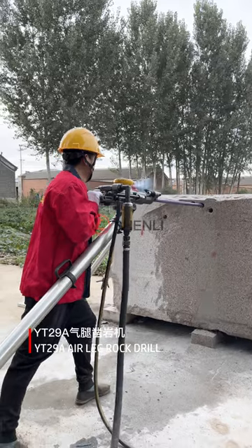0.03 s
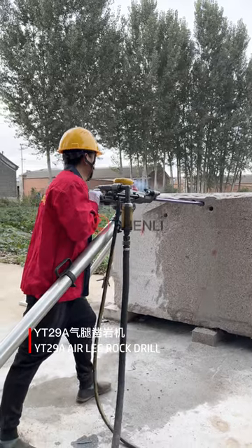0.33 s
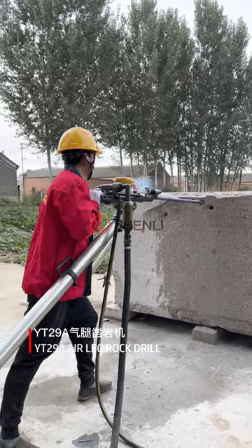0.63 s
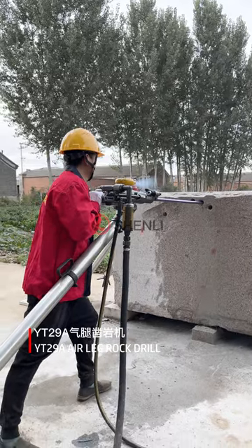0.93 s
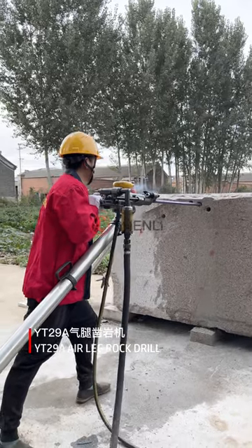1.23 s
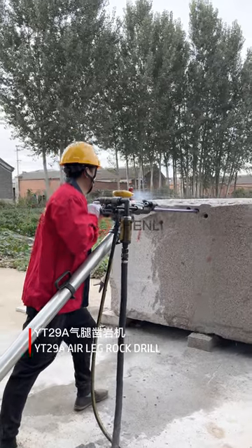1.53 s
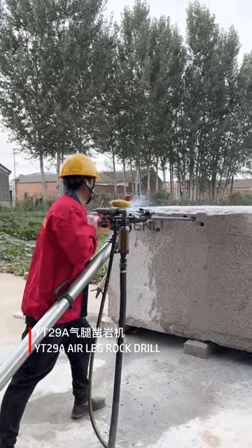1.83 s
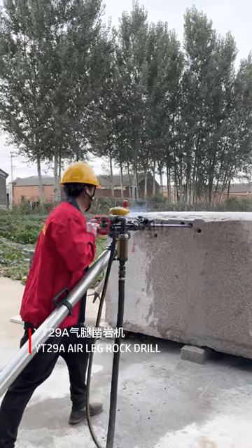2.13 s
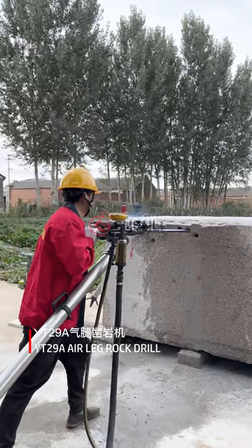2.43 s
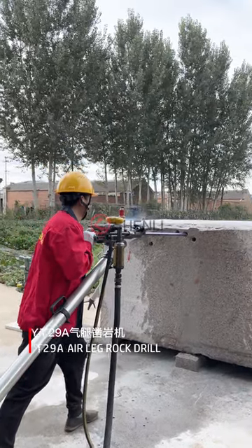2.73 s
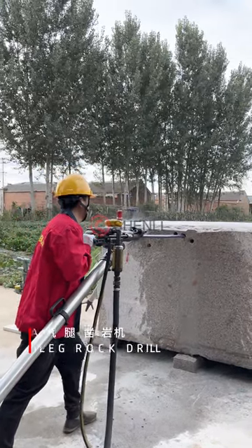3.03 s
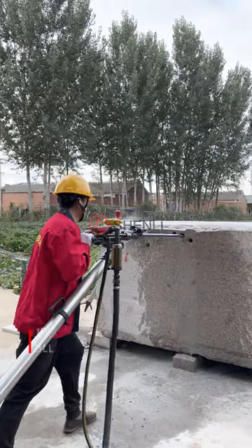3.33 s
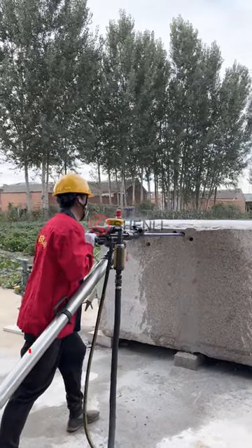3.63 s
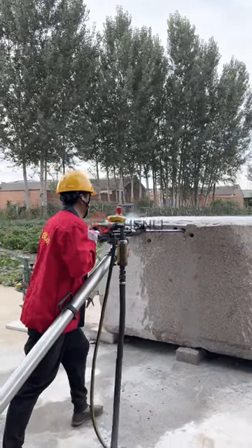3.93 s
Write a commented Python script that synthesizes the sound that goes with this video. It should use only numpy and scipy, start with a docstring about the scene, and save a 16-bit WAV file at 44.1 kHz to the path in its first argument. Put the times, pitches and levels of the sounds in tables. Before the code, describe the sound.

A pneumatic rock drill hammers into stone outdoors for the whole four seconds, about 36 beats a second, with a low buzzing exhaust and constant air hiss. The steel rod rattles in small swells, crunches stone and gives a high, wavering ring toward the right. The level holds fairly steady until about 1.5 seconds, then gradually falls while the drilling keeps its pace.

```python
"""In an open yard, an air-powered rock drill bores into a stone block, slowly growing quieter.
Its piston goes back and forth about 36 times a second. Each cycle lets out two puffs of air,
strikes the drill steel (the rod that cuts the stone) and knocks more lightly on the way back.
The steel rattles in the chuck that holds it, crushes stone and rings near 4.8 kHz.
Compressed air hisses throughout."""
import sys
import numpy as np
from scipy import signal
from scipy.fft import rfft, irfft, next_fast_len
from scipy.io import wavfile
from scipy.ndimage import map_coordinates

SR = 44100
rng = np.random.default_rng(int(sys.argv[2]) if len(sys.argv) > 2 else 0)


def generate_wav(sig):
    """Save sig (samples, or channels by samples) to the path in sys.argv[1] as 16-bit PCM at SR."""
    pcm = np.round(np.clip(np.atleast_2d(sig).T, -1, 1) * 32767).astype(np.int16)
    wavfile.write(sys.argv[1], SR, pcm)


N = 176400

# How fast the piston runs. Each row: time in seconds, cycles per second.
PISTON_SPEED = [(0.0, 34.524), (0.062, 36.048), (0.417, 35.315), (0.417, 35.032), (0.449, 35.703),
                (0.524, 34.581), (0.53, 35.893), (0.881, 35.342), (0.961, 36.227), (1.158, 34.946),
                (1.216, 35.918), (1.411, 35.309), (1.458, 35.813), (1.783, 35.27), (1.817, 35.764),
                (1.892, 35.163), (1.945, 36.862), (2.041, 35.139), (2.091, 36.58), (2.193, 35.478),
                (2.296, 36.522), (2.445, 35.409), (2.646, 36.919), (2.698, 35.883), (2.781, 37.593),
                (2.856, 34.933), (3.156, 36.057), (3.257, 35.158), (3.364, 36.429), (3.52, 35.167),
                (3.744, 36.082), (3.788, 34.729), (3.851, 36.202), (4.0, 35.145)]
# The fade of everything but the steel's main ring. Each row: time in seconds, gain in dB.
DRILL_FADE = [(0.0, -24.5), (1.6, -26.5), (3.8, -35), (4.0, -36.5)]
# What happens in one cycle. Each row: place in the cycle from 0 to 1, relative level in dB.
PUFF_PLACES = [(0.358, -5), (0.829, -5)]
KNOCK_PLACES = [(0.185, -1), (.465, 1.5)]  # the return knock, then the working blow
# The exhaust's hum. Each row: multiple of the piston speed, relative level in dB.
HUM_TONES = [(2, -9), (4, -12), (7, -21.5), (10, -26), (14, -27)]
# The tone colour of each sound. Each row: frequency in Hz, relative level in dB.
PUFF_COLOUR = [(20, -54.5), (36, -35.5), (55, 5.5), (72, 12.5), (110, -0.5), (145, 9.5), (175, 13),
               (215, -10.5), (260, 0.5), (360, 0.5), (500, 1.5), (800, -15), (2000, -29.5)]
ROAR_COLOUR = [(20, -43), (60, -20), (150, 7.5), (280, -9), (480, -1), (750, -4.5), (1500, -10),
               (5000, -57)]
CRACK_COLOUR = [(100, -9), (450, 8.5), (1200, 5), (2500, 0), (8000, -4), (15000, -6)]
THUD_COLOUR = [(60, -38), (200, -16), (400, 5), (650, 5.5), (850, 1.5), (1200, -21), (2000, -8),
               (5000, -59)]
RATTLE_COLOUR = [(200, -10.5), (600, -6), (950, 4.5), (1300, 1.5), (1600, 0.5), (1850, -14), (3000, 0),
                 (8000, -48.5)]
GRIT_COLOUR = [(150, 9.5), (400, 11.5), (900, 10), (1800, -7), (3000, 18), (4000, 8.5), (5100, 1),
               (7000, 10), (14000, -39)]
HISS_COLOUR = [(30, -84.5), (200, 19), (1000, -1), (2500, 8), (4000, 8), (5500, 10.5), (7000, 2.5),
               (9500, 4.5), (12500, 3), (14000, 3), (16000, -20)]
GRIND_COLOUR = [(300, -23), (1000, -9), (1700, -4.5), (2600, -3), (3500, 10), (5000, -5), (9000, -44)]
ECHO_COLOUR = [(140, -12.0), (500, 3.5), (2500, 12.0), (8000, -43)]
# The housing's tones. Each row: frequency in Hz, relative level in dB, seconds to fade by 60 dB.
HOUSING_TONES = [(360, 4.5, 0.042), (498.6, -4.5, 0.043), (623, -7, 0.009), (1055, -6, 0.072)]
# Bursts of rattling in the chuck. Each row: time of the peak in seconds, relative level in dB.
RATTLE_BURSTS = [(0.01, 2.5), (.145, -4), (.34, -3), (.735, 1), (0.908, 0.5), (1.03, -7), (1.11, -5),
                 (1.298, 0.5), (1.499, -1), (1.69, -5), (1.869, -2), (2.18, -3), (2.37, -7), (2.52, -6),
                 (2.885, -2), (3.02, -9), (3.21, -2), (3.497, 2), (3.71, -8), (3.85, -4)]
# The steel's weaker tones. Each row: frequency in Hz, relative level in dB, rate of wavering in Hz.
STEEL_TONES = [(1569, 2, 51), (2105, 5, 70), (2521, 3.5, 60), (2740, 2.5, 79), (2995, 6.5, 99),
               (3194, 6.5, 40), (6470, 6, 24), (8160, 3.5, 24)]
# One tone flares up as the bit seats differently in the stone.
# Each row: time of the peak in seconds, frequency in Hz, relative level in dB.
STEEL_FLARES = [(0.063, 2526, -7), (0.465, 2526, -9), (0.91, 2526, -9), (0.69, 2900, -8), (3.37, 3208, -6),
                (1.58, 6465, -11), (3.33, 6465, -15), (1.47, 8121, -20), (3.0, 8121, -5)]
# The strength of the steel's main ring. Each row: time in seconds, relative level in dB.
RING_LEVEL = [(0.0, -45), (0.05, -34), (0.2, -36), (0.7, -32), (0.76, -44), (0.77, -35), (1.18, -38),
              (1.22, -42), (1.35, -33), (1.39, -41), (1.49, -31), (1.6, -38), (1.64, -33), (2.16, -38),
              (2.33, -33), (2.38, -43), (2.43, -37), (2.83, -39), (2.87, -47), (2.91, -37), (3.01, -47),
              (3.1, -33), (3.14, -47), (3.35, -39), (3.4, -45), (3.8, -42), (3.82, -50), (4.0, -44)]
# Where that ring sits. Each row: time in seconds, left minus right level in dB.
RING_BALANCE = [(0.0, -2.0), (0.05, -18), (1.77, -22), (1.79, -11), (2.73, -4.5), (3.38, -15), (4.0, -6)]
# Where the machine and its hiss sit. Each row: frequency in Hz, left minus right level in dB.
BODY_BALANCE = [(100, -1.5), (200, -3), (330, -2), (520, -8), (800, 1.5), (1100, 6), (1700, -4.5),
                (2200, -5), (2700, 1), (4300, -7), (5100, 9), (6200, 2)]
HISS_BALANCE = [(4500, 0.98), (6500, 0.27)]
# How much later the right microphone hears. Each row: frequency in Hz, delay in milliseconds.
RIGHT_DELAY = [(100, .02), (1500, .035), (2700, .115), (3300, .11), (5400, .26), (7700, .256), (10000, .25),
               (14000, .244)]
# The length of the yard's echo. Each row: frequency in Hz, seconds to fade by 60 dB.
ECHO_FADE = [(100, 0.32), (1500, 0.071), (12000, 0.037)]

PUFF_DB, ROAR_DB, CRACK_DB, THUD_DB, HOUSING_DB = -6.5, -14, -9, -14.5, -14
RATTLE_DB, GRIT_DB, STEEL_DB, HISS_DB, ECHO_DB = -9.5, -10.5, -12, -6, -18
CRACK_FADE_S, STEEL_RISE_S, STEEL_FADE_S = .011, .002, .06  # a fade is a drop of 60 dB
KNOCK_RISE_DB_PER_S = 1  # crack and thud stand out more as the rest fades
RATTLE_WIDTH_S, FLARE_WIDTH_S = .015, .023
RING_HZ, RING_DB, WAVER_HZ = 4830, 3, 30
RASP_DB, RASP_WIDTH_HZ = -12, 130


def amp(db):
    """Turn decibels into a number to multiply by."""
    return 10 ** (np.asarray(db) / 20)


def unit(x):
    """Scale a signal to an average strength (rms) of 1."""
    return x / np.sqrt(np.mean(x ** 2) + 1e-20)


def along(points, hz):
    """Read between the rows of a frequency table, on a logarithmic scale."""
    freqs, values = np.transpose(points)
    return np.interp(np.log(hz + 1), np.log(freqs + 1), values)


def curve(rows):
    """Join (seconds, value) rows with straight lines, one value per sample."""
    times, values = np.transpose(rows)
    return np.interp(np.arange(N) / SR, times, values)


def wobble(rate):
    """A smooth curve through `rate` random values a second."""
    return map_coordinates(rng.standard_normal(N // 100), [np.arange(N) * rate / SR], mode="wrap")


def filtered(x, response):
    """Multiply each frequency in x by response(hz)."""
    size = next_fast_len(N + SR // 2)
    return irfft(rfft(x, size) * response(np.fft.rfftfreq(size, 1 / SR)), size)[..., :N]


def coloured(x, points, size=8192):
    """Give x a tone colour from a table, at strength 1."""
    cepstrum = irfft(np.log(amp(along(points, np.fft.rfftfreq(size, 1 / SR)))))
    cepstrum[1:size // 2] *= 2  # folded so the filter rings after a hit, never before
    cepstrum[size // 2 + 1:] = 0
    response = irfft(np.exp(rfft(cepstrum)))
    return unit(signal.fftconvolve(x, response)[:N])


def strokes(cycles, rows, scatter_db=1.0, jitter_s=.00006):
    """One click per cycle for each (place, dB) row, a little uneven in size and timing."""
    out, cycle = np.zeros(N), np.arange(int(cycles[-1]) + 1)
    for place, db in rows:
        size, late = rng.standard_normal((2, len(cycle)))
        on_time = np.interp(cycle + place, cycles, np.arange(N))
        at = np.round(on_time + late * jitter_s * SR).astype(int)
        keep = (at >= 0) & (at < N) & (cycle + place < cycles[-1])
        out[at[keep]] += amp(db + scatter_db * size)[keep]
    return out


def surge(cycles, place, fall_db):
    """A gain that jumps at one place in each cycle and falls until the next jump."""
    return amp(-fall_db * ((cycles - place) % 1))


def bump(peak_s, width_s):
    """A bell-shaped rise and fall around one moment."""
    return np.exp(-.5 * ((np.arange(N) / SR - peak_s) / width_s) ** 2)


def grains(per_s, spread_db):
    """Tiny impacts at random times and of random sizes."""
    clicks = (rng.random(N) < per_s / SR) * np.sign(rng.standard_normal(N))
    return clicks * amp(spread_db * np.clip(rng.standard_normal(N), -2, 2))


def placed(x, balance):
    """Make stereo: each frequency gets a left-right balance and reaches the right side later."""
    half = np.array([[.5], [-.5]])

    def response(hz):
        delay_s = along(RIGHT_DELAY, hz) / 1000
        return amp(half * along(balance, hz)) * np.exp(2j * np.pi * hz * delay_s * half)
    return filtered(x, response)


def exhaust(cycles):
    """Two puffs a cycle leave the muffler, making a hum, and swirling air roars after each."""
    puffs = -coloured(strokes(cycles, PUFF_PLACES), PUFF_COLOUR)
    phase = 2 * np.pi * (cycles - PUFF_PLACES[0][0])
    hum = sum(-np.sqrt(2) * amp(db) * np.cos(multiple * phase) for multiple, db in HUM_TONES)
    flow = sum(amp(db) * surge(cycles, place, fall_db=24) for place, db in PUFF_PLACES)
    roar = coloured(flow * rng.standard_normal(N), ROAR_COLOUR)
    return amp(PUFF_DB) * puffs + hum + amp(ROAR_DB) * roar


def piston(cycles):
    """The piston knocks at both ends of its travel: a sharp crack, a thud and a ring of the housing."""
    t = np.arange(N) / SR
    hits = strokes(cycles, KNOCK_PLACES, scatter_db=2.5)
    decay = amp(-60 * t[:SR // 20] / CRACK_FADE_S)
    bursts = signal.fftconvolve(hits, decay)[:N]
    crack = amp(CRACK_DB) * coloured(bursts * rng.standard_normal(N), CRACK_COLOUR)
    thud = amp(THUD_DB) * coloured(hits, THUD_COLOUR)
    rise = amp(KNOCK_RISE_DB_PER_S * (t - t.mean()))
    return rise * (crack + thud) + amp(HOUSING_DB) * housing(hits)


def housing(hits, scatter_db=1.0):
    """Every knock rings the drill's casing with a slightly different mix of its tones."""
    t, out = np.arange(SR // 5) / SR, np.zeros(N + SR)
    tones = np.array([amp(db - 60 * t / fade_s) * np.sin(2 * np.pi * hz * t)
                      for hz, db, fade_s in HOUSING_TONES])
    for at in np.flatnonzero(hits):
        mix = amp(scatter_db * rng.standard_normal(len(tones)))
        out[at:at + len(t)] += hits[at] * mix @ tones
    return unit(out[:N])


def chuck_rattle(cycles):
    """The loose steel rattles after each blow, swelling about five times a second as it turns."""
    swell = amp(-6) + sum(amp(db) * bump(peak_s, RATTLE_WIDTH_S) for peak_s, db in RATTLE_BURSTS)
    shake = amp(3.7 * np.cos(2 * np.pi * (cycles - .58)))
    contacts = grains(per_s=1100, spread_db=4.0) * swell * shake
    return amp(RATTLE_DB) * coloured(contacts, RATTLE_COLOUR)


def drill_bit(cycles):
    """Each blow crushes stone at the tip and rings the steel's weaker tones, which flare now and then."""
    bite = amp(1.5 * np.cos(2 * np.pi * (cycles - .55)) + 3.5 * wobble(40))
    grit = coloured(grains(per_s=5000, spread_db=11) * bite, GRIT_COLOUR)
    blows = strokes(cycles, KNOCK_PLACES[1:])
    flares = np.zeros(N)
    for peak_s, hz, db in STEEL_FLARES:
        tone = singing_steel(blows, [(hz, 0, WAVER_HZ)], flutter_db=1)
        flares += amp(db) * bump(peak_s, FLARE_WIDTH_S) * tone
    tones = singing_steel(blows, STEEL_TONES, flutter_db=3)
    return amp(GRIT_DB) * grit + amp(STEEL_DB) * tones + flares


def singing_steel(blows, rows, flutter_db):
    """The steel's tones swell with every blow and waver in pitch and strength."""
    t = np.arange(SR // 4) / SR
    shape = (1 - np.exp(-t / STEEL_RISE_S)) ** 2 * amp(-60 * t / STEEL_FADE_S)
    swell = unit(signal.fftconvolve(blows, shape)[:N]) + .5  # never silent between blows
    t, tones = np.arange(N) / SR, np.zeros(N)
    for hz, db, waver_hz in rows:
        strength = amp(db + flutter_db * wobble(waver_hz / 3))
        tones += strength * np.sin(2 * np.pi * hz * t + 1.1 * wobble(waver_hz))
    return unit(swell * tones)


def air_hiss(cycles):
    """Compressed air hisses, surging as the valve flips."""
    flow = surge(cycles, place=0.14, fall_db=1.5) * amp(1.1 * wobble(45))
    return amp(HISS_DB) * coloured(flow * rng.standard_normal(N), HISS_COLOUR)


def stone_scatter(cycles, hiss_db=-18, grind_db=-13.5):
    """Hiss and grinding bounce off the stone, so each microphone gets its own noise."""
    bite = amp(2 * np.cos(2 * np.pi * (cycles - .55)) + 2.2 * wobble(29.85))
    hiss = np.array([coloured(noise, HISS_COLOUR) for noise in rng.standard_normal((2, N))])
    grind = np.array([coloured(noise * bite, GRIND_COLOUR) for noise in rng.standard_normal((2, N))])
    return amp(hiss_db) * hiss + amp(grind_db) * grind


def steel_ring(cycles):
    """The steel vibrates along its length: a whine kept up by every blow and roughened by rebounds."""
    blows = strokes(cycles, KNOCK_PLACES[1:], scatter_db=2.5, jitter_s=0.0018)
    rebounds = surge(cycles, place=0.37, fall_db=4.0) * rng.standard_normal(N)
    rasp = unit(filtered(rebounds, lambda hz: 1 / (1 + 2j * (hz - RING_HZ) / RASP_WIDTH_HZ) ** 2))
    whine = singing_steel(blows, [(RING_HZ, 0, WAVER_HZ)], flutter_db=0.88)
    ring = placed(unit(whine + amp(RASP_DB) * rasp), [(RING_HZ, 0)])  # delay only; balance comes next
    sides = amp(curve(RING_BALANCE) * np.array([[.5], [-.5]]))
    return amp(curve(RING_LEVEL) + RING_DB) * sides / sides.mean(axis=0) * ring


def yard_echo(x):
    """The block and the ground throw back a short, thin echo."""
    freqs, t, spectrum = signal.stft(rng.standard_normal((2, SR // 3)), SR, nperseg=256)
    decay = amp(-60 * t / along(ECHO_FADE, freqs)[:, None])
    tail = signal.istft(spectrum * decay, SR, nperseg=256)[1]
    echo = signal.fftconvolve(x, tail / np.linalg.norm(tail[0]), axes=1)[:, :N]
    return filtered(echo, lambda hz: amp(along(ECHO_COLOUR, hz)))


def scene():
    """The piston sets the beat for the whole drill, and the yard adds its echo."""
    cycles = -.11 + np.cumsum(curve(PISTON_SPEED)) / SR  # running count of piston cycles
    body = exhaust(cycles) + piston(cycles) + chuck_rattle(cycles) + drill_bit(cycles)
    hiss = placed(air_hiss(cycles), HISS_BALANCE) + stone_scatter(cycles)
    drill = amp(curve(DRILL_FADE)) * (placed(body, BODY_BALANCE) + hiss) + steel_ring(cycles)
    return drill + amp(ECHO_DB) * yard_echo(drill)


def record(dry, bass_hz=33, top_hz=15800):
    """The microphones lose the deepest bass and the very highest treble."""
    return filtered(dry, lambda hz: (hz < top_hz) * hz ** 4 / (hz ** 4 + bass_hz ** 4))


dry = scene()
out = record(dry)
generate_wav(out)
```